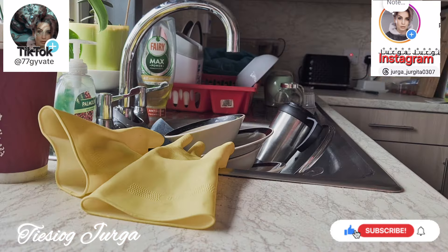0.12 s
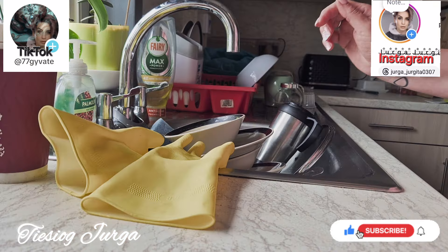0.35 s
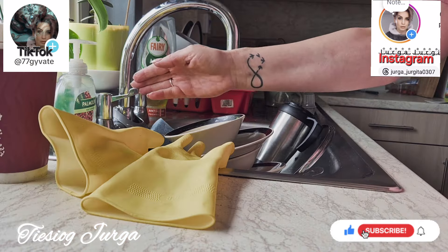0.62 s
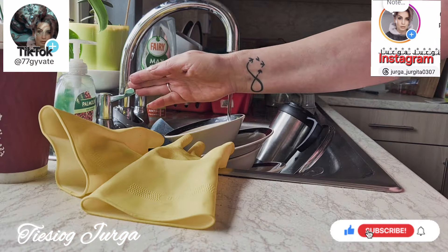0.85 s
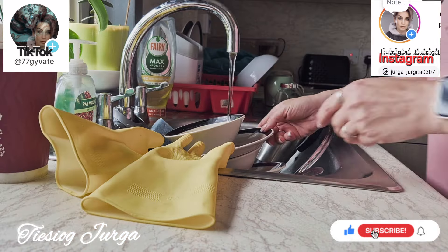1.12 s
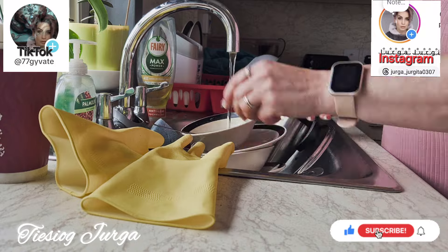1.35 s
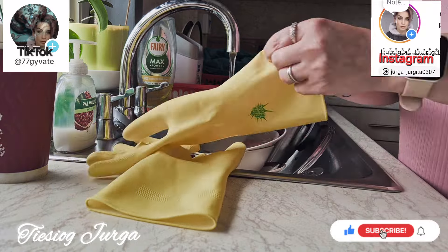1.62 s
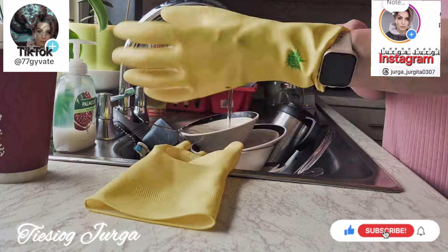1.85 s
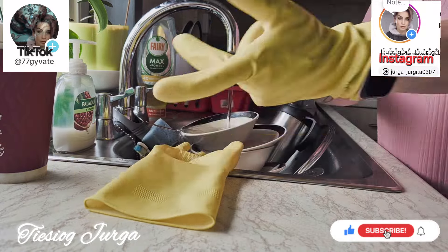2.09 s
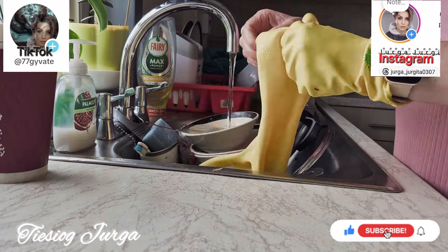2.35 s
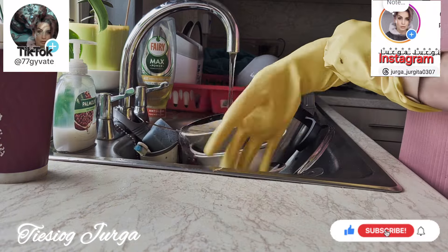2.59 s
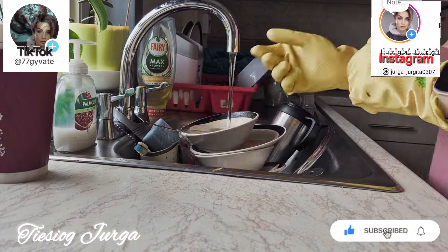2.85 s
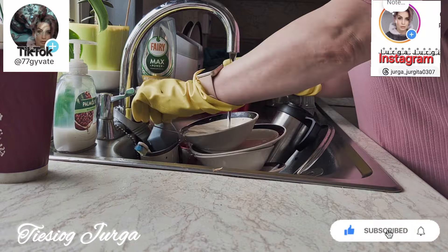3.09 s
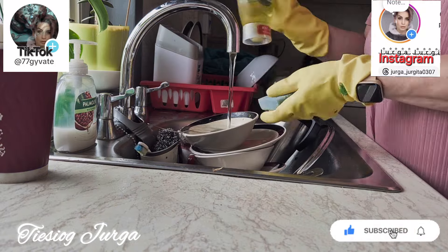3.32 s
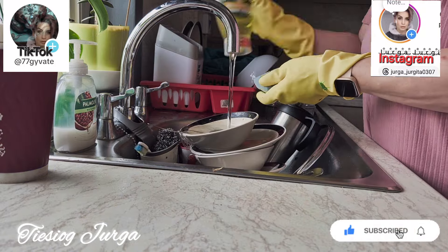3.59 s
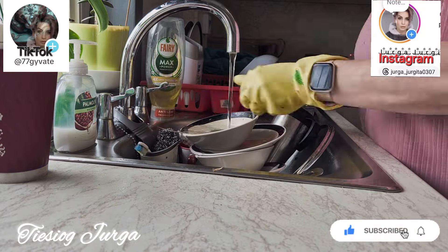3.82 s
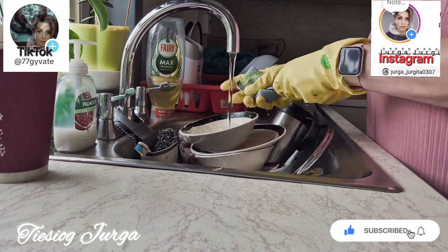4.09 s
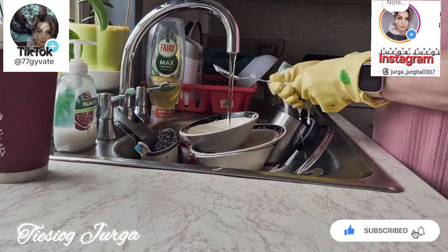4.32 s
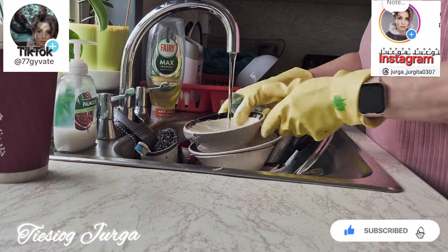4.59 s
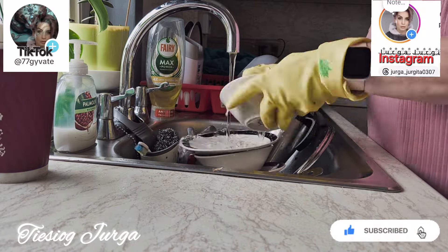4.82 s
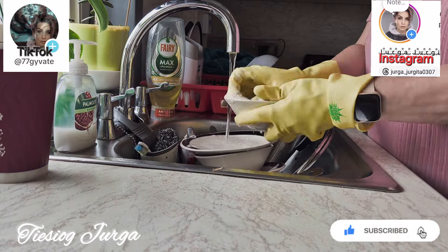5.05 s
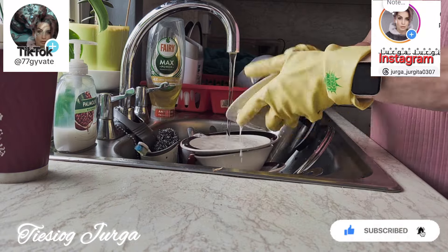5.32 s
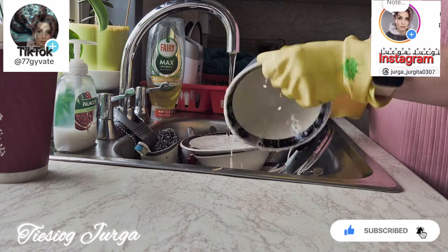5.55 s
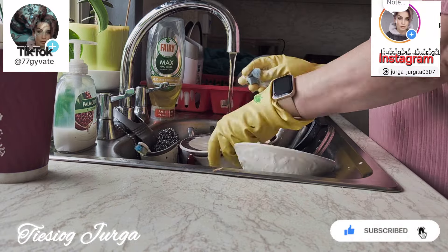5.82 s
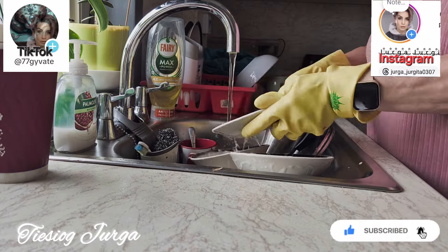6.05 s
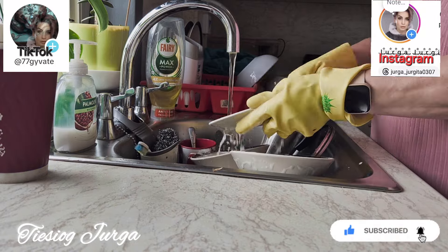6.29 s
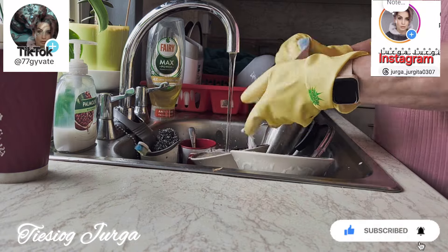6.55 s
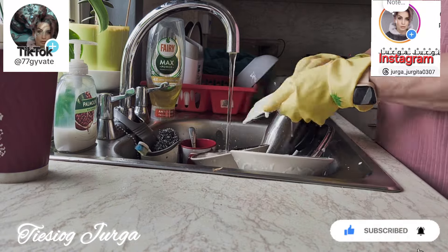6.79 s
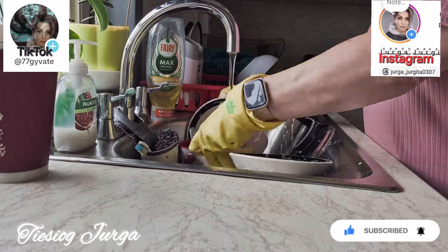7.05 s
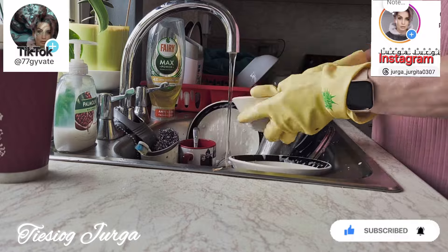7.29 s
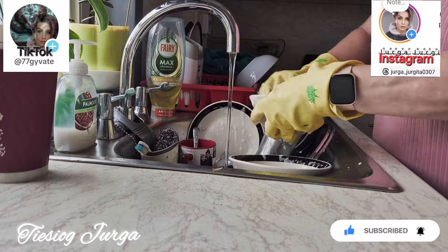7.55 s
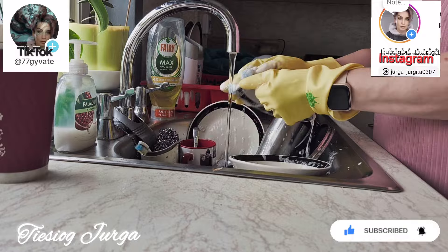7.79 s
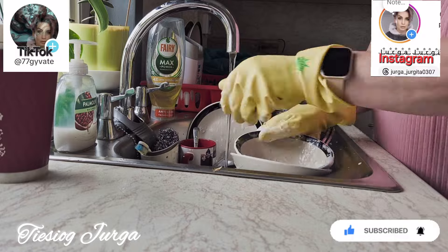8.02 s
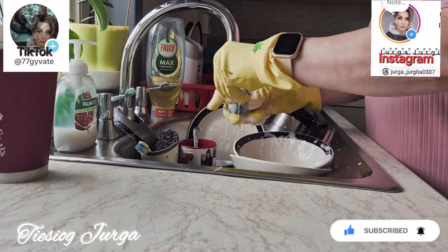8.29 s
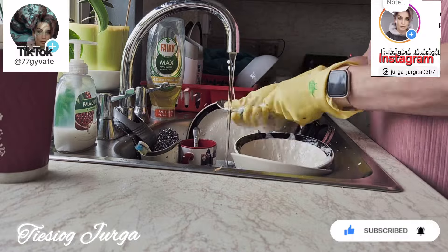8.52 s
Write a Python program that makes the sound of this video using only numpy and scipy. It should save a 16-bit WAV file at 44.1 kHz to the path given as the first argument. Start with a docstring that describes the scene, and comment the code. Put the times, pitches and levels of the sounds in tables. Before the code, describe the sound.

Running tap water drums on a metal sink as bowls, plates and a steel mug clack sharply together, like sped-up dishwashing heard close.

```python
"""A low wavering hum is cut off; after a blink of silence a kitchen tap opens with a thin whistle and a trickle.
The stream grows: noise hisses, gurgles among the dishes with small bubbles and, from 1.1 s, drums on the steel sink.
Bowls, plates, a spoon and a steel mug then knock together in gloved hands, amid large bubbles, rustles and splashes.
Each blow rings a set of tones over noise; as if time ran fast, most swell, ring for a few hundredths of a second
and are faded out. Sink walls and tiles answer shortly, and quiet kitchen air lies beneath the water."""
import sys
import numpy as np
from scipy import signal
from scipy.fft import rfft, irfft, next_fast_len
from scipy.io import wavfile
from scipy.ndimage import uniform_filter1d, map_coordinates

SR = 44100
rng = np.random.default_rng(int(sys.argv[2]) if len(sys.argv) > 2 else 0)


def int16_out(signal):
    """Quantize to a 16-bit WAV file."""
    q = np.round(np.clip(np.atleast_2d(signal).T, -1, 1) * 32767)
    wavfile.write(sys.argv[1], SR, q.astype(np.int16))


def boost_factor(decibels):
    """Convert a level in decibels to a linear amplitude factor."""
    exponent = np.asarray(decibels, float) / 20
    return 10 ** exponent


N = 381465  # samples in the scene
SLICE = 6144  # samples that hold one blow
WATER_FROM_S = 0.108  # water and kitchen air are silent before this

# low tones shared by the steel sink and the rustles: f/Hz, level/dB
LOW_MODES = [(132, -4), (240, 0), (350, 2), (520, 0), (760, -11), ]


def along(points, hz):
    """Reads a curve of (f/Hz, value) points on a log frequency axis."""
    f, v = np.transpose(points)
    return np.interp(np.log(hz + 1), np.log(f + 1), v)


def unit(x):
    """Scales a sound to rms 1."""
    return x / np.sqrt(np.mean(x ** 2) + 1e-20)


def wobble(rate):
    """A smooth random curve through rate random points a second."""
    points = rng.standard_normal(int(N * rate / SR) + 4)
    return map_coordinates(points, [np.arange(N) * rate / SR])


def coloured(pair, gain):
    """Two unrelated signals become left and right, alike in the bass, with a gain for each frequency."""
    # how alike the two sides are: f/Hz, likeness (0 to 1)
    alike = [(60, 0.91), (330, 0.94), (640, 0.39), (1500, 0.16), (4000, 0.022)]
    size = next_fast_len(pair.shape[1] + 2048)
    hz = np.fft.rfftfreq(size, 1 / SR)
    turn = np.arccos(np.clip(along(alike, hz), 0, 1)) / 2
    mid, side = rfft(pair, size) * gain(hz) * [np.cos(turn), np.sin(turn)]
    return irfft([mid + side, mid - side], size)[:, :pair.shape[1]]


def rush(spectrum, patchy_db):
    """Stereo noise of rms 1 whose gain varies in random patches of time and pitch."""
    z = signal.stft(rng.standard_normal((2, N)), nperseg=512)[2]
    field = rng.standard_normal(z.shape[1:])
    for axis in (0, 1):
        field = uniform_filter1d(field, size=5, axis=axis)
    pair = signal.istft(z * boost_factor(patchy_db * unit(field)), nperseg=512)[1][:, :N]
    # beyond its ends the spectrum falls away
    points = [(spectrum[0][0] / 2, -80), *spectrum, (spectrum[-1][0] * 4.5, -80)]
    return unit(coloured(pair, lambda hz: boost_factor(along(points, hz))))


def bubbles(start_s, peak_db, hz, swell_s, rise):
    """Soft swelling tones whose pitch climbs as the bubble nears the surface; the sides differ a little in phase."""
    t = np.arange(SLICE // 4) / SR
    u = t / swell_s[:, None]
    shape = boost_factor(peak_db)[:, None] * u * np.exp(1 - u)  # peaks at u = 1
    cycles = hz[:, None] * t * (1 + rise * u)
    at = (start_s * SR).astype(int)[:, None] + np.arange(len(t))
    sides = []
    for phase in .3 * rng.uniform(size=(len(hz), 2)).T[:, :, None]:
        tones = shape * np.sin(2 * np.pi * (cycles + phase))
        # add every bubble at its own place in time
        sides.append(np.bincount(at.ravel(), tones.ravel(), N + SLICE)[:N])
    return np.array(sides)


def hissing(hiss_db):
    """Air-filled water hisses as bright noise; a thin trickle lacks the top fizz, which comes with the stream."""
    # spectrum of the hiss: f/Hz, level per Hz/dB
    spectrum = [(2350, -6.5), (4000, -10.5), (5350, -6.5), (6610, -2), (7160, 1.5), (7760, -2.5), (8600, 3),
                (10500, -11.5), (11100, -9), (12100, -2.5), (13700, -5), (15100, -6), (15800, -1)]
    hiss = rush(spectrum, patchy_db=1.1)
    fizz = irfft(rfft(hiss) * (np.fft.rfftfreq(N, 1 / SR) > 9800), N)
    return hiss - fizz * np.clip((-62 - hiss_db) / 12, 0, 1)


def gurgling():
    """Water among the dishes: patchy noise mixed with many small bubbles, scaled to rms 1."""
    # spectrum of the gurgle: f/Hz, level per Hz/dB
    spectrum = [(260, -12), (450, -8), (889, -9), (1240, -3), (1760, -6.5), (2380, -9), (5500, -6.5),
                (7150, -44), (12100, -120)]
    count, small_share = 2500, .55
    when, pitch, size = rng.uniform(size=(count, 3)).T
    hz = 1500 * np.exp(.9 * (2 * pitch - 1))
    peak_db = -3.5 * np.log(size + .01) + 8 * np.log(hz / 1500)
    small = bubbles(when * N / SR, peak_db, hz, 3 / hz, rise=.01)
    return unit(rush(spectrum, patchy_db=2.6) + small_share * unit(small))


def drumming():
    """The stream beats on the steel floor of the sink: low noise, scaled to rms 1."""
    # spectrum of the drumming: f/Hz, level per Hz/dB
    spectrum = [(25, -42), (54, -20.5), (128, 4.5), (167, -6.5), (243, -3), (325, -9), (377, -7.5),
                (600, -13.5), (780, -58), (1320, -120)]
    return rush(spectrum, patchy_db=1.8)


def large_bubbles():
    """Single large bubbles plop as short tones, each with a lower, weaker one; their level flutters."""
    # single plops: t/s, peak level/dB, f/Hz
    plops = [(1.455, -39, 1386), (1.554, -40.5, 1326), (1.669, -47, 1235), (1.747, -36.5, 777),
             (1.862, -41, 623), (2.298, -41, 820), (2.457, -41.5, 1515), (4.109, -39, 1206),
             (4.352, -43, 1500), (5.293, -34, 1223), (5.311, -40, 940), (7.659, -35, 1135),
             (7.658, -33, 930), (7.711, -42, 2680)]
    s, db, hz = np.transpose(plops)
    swell_s = np.full(len(s), .006)
    main = bubbles(s, db + 0.5, hz, swell_s, rise=0.0068)
    lower = bubbles(s, db - 4, hz * 0.98, swell_s, rise=0.0068)
    return (main + lower) * boost_factor(3 * wobble(150))


def tap():
    """The running water: hiss, gurgle and drumming follow the stream and swell in splashes, with large bubbles."""
    # how the water runs: t/s, strength of the stream (level/dB), sloshing among the dishes (level/dB)
    course = [(0.13, -101, 6), (0.3, -74.5, 7), (0.58, -68, -3), (0.7, -59, 0.5), (0.78, -45.5, -4.5),
              (0.9, -41, 2), (1.12, -39, -4), (1.35, -43, -5), (2.6, -35.5, 3.5), (3.3, -34.5, -0.5),
              (4.2, -35, 3), (5.55, -34.5, 1.5), (5.8, -41, 3.5), (6.03, -40, 1), (7.9, -37.5, 5.5),
              (8.15, -37, 8), (8.6, -37, 1.5)]
    open_db = -45  # below this strength the gurgle weakens too
    gurgle_base_db, gurgle_growth = -48.5, 0.7  # growth: dB per dB of a weaker stream
    drum_base_db, drum_from_s = -50.5, 1.075
    s, *levels = np.transpose(course)
    t = np.arange(N) / SR
    hiss_db, slosh_db = [np.interp(t, s, level) for level in levels]
    gurgle_db = gurgle_base_db + gurgle_growth * np.minimum(hiss_db - open_db, 0) + slosh_db
    drum_gain = boost_factor(drum_base_db + 0.36 * slosh_db) * np.clip((t - drum_from_s) / 0.035, 0, 1)
    # splashes are brief broad swells: only the upward swings of chance count
    splash = np.clip(wobble(30), 0, 2) ** 2
    gurgle = gurgling()
    stream = drum_gain * boost_factor(1.3 * wobble(24) + 0.6 * splash) * drumming()
    stream += boost_factor(gurgle_db + 1.7 * splash) * gurgle
    stream += boost_factor(hiss_db + 0.6 * splash + 0.6 * wobble(4.1)) * hissing(hiss_db)
    plops = large_bubbles()
    # the splash around each large bubble
    spatter = uniform_filter1d(np.abs(plops), size=600, axis=1) * gurgle
    return stream * (t > WATER_FROM_S) + plops + spatter


def contact(hz, mode_db, swell_ms, t60, blur_db, clatter_db):
    """One contact: clear ringing tones, the same tones blurred by scraping, and a broad chattering clatter."""
    # broad clatter of every contact: f/Hz, level per Hz/dB
    clatter_spectrum = [(24, -50), (60, -14), (288, -2), (1140, -2), (5770, -10.5), (8180, -16),
                        (15700, -28.5)]
    chatter_per_s, chatter_depth, chatter_s = 300, .45, .002
    t, grid = np.arange(SLICE) / SR, np.fft.rfftfreq(SLICE, 1 / SR)
    after = np.maximum(t - swell_ms / 1000, 0)
    size = boost_factor(mode_db + 2.0 * rng.standard_normal(len(hz)))
    # high modes lose their energy sooner
    dying = boost_factor(-60 * after * (1 + (hz[:, None] / 6000) ** 4) / t60)
    cycles = hz[:, None] * t + rng.uniform(size=(2, len(hz), 1))
    ring = np.einsum("mt,cmt->ct", size[:, None] * dying, np.sin(2 * np.pi * cycles))
    # scraping contact drives the same modes with noise and blurs them
    width = 40 + 0.029 * hz[:, None]
    peaks = size @ (1 / (1 + ((grid - hz[:, None]) / width) ** 2))
    noise = rfft(rng.standard_normal((2, 2, SLICE)))
    blur, clatter = irfft(noise * [[peaks], [boost_factor(along(clatter_spectrum, grid))]])
    # the contact chatters: a few sharp micro-impacts, each gone in milliseconds
    ticks = (rng.uniform(size=SLICE) < chatter_per_s / SR) * rng.exponential(size=SLICE)
    tick_decay = np.exp(-t[:SLICE // 8] / chatter_s)
    chatter = 1 + chatter_depth * np.convolve(ticks, tick_decay)[:SLICE]
    top = slice(0, round(swell_ms * SR / 1000) + 400)
    clear = ring / np.std(ring[:, top])
    rub = boost_factor(blur_db - 60 * after / 0.18) * unit(blur)
    rattle = boost_factor(clatter_db - 60 * after / 0.11) * unit(clatter) * chatter
    return clear, rub + rattle


def blows(table, modes, knock_db, t60, blur_db, clatter_db):
    """Each blow swells, decays and is faded out; thud, knock and clink (low, middle, high) get their own levels.
    knock_db: how far the knock stands over thud and clink; t60: seconds in which low modes fall by 60 dB."""
    fade_ms = 11.8
    out, t_ms = np.zeros((2, N + SLICE)), np.arange(SLICE) / SR * 1000
    hz, mode_db = np.transpose(modes)
    for s, swell_ms, length_ms, db, bright_db in table:
        bands_db = db - knock_db - bright_db, db, db - knock_db + bright_db  # thud, knock, clink
        clear, rough = contact(hz, mode_db, swell_ms, t60, blur_db, clatter_db)
        # light contacts rub more than they strike: less clear ring
        sound = boost_factor(min(0, 0.22 * (max(bands_db) + 10.0))) * clear + rough
        low = coloured(sound, lambda f: 1 / (1 + (f / 600) ** 6))
        under = coloured(sound, lambda f: 1 / (1 + (f / 2500) ** 8))
        parts = low, under - low, coloured(sound, np.ones_like) - under
        top = slice(0, round(swell_ms * SR / 1000) + 400)
        sound = sum(boost_factor(band_db) * p / np.std(p[:, top]) for band_db, p in zip(bands_db, parts))
        swell = np.sin(np.pi / 2 * np.clip(t_ms / swell_ms, 0, 1))
        fade = np.sin(np.pi / 2 * np.clip((length_ms - t_ms) / fade_ms, 0, 1)) ** 2
        out[:, round(s * SR):][:, :SLICE] += sound * swell * fade
    return out[:, :N]


def plates():
    """Plates knock: many dense modes that die quickly."""
    # blows: t/s, swell/ms, length/ms, level/dB, brightness/dB (more clink, less thud)
    hits = [(4.436, 1, 21.6, -15, 11), (4.444, 1.3, 48, -17.5, 8.5), (4.497, 9.8, 39, -28.5, -4.5),
            (4.592, 6.3, 70, -19, -3.5), (4.728, 13, 40, -40, 9), (4.755, 7.6, 39, -29.5, 0.5),
            (4.79, 70, 110, -41.5, 7), (5.655, 18, 34.4, -18, 5), (5.685, 0.77, 23, -10, -3.5),
            (5.688, 8.8, 38, -13, -9.5), (5.87, 30, 77, -32.5, 1.5), (5.922, 25, 60, -34, 1)]
    # ringing tones: f/Hz, level/dB
    modes = [(140, -6), (300, -5), (431, -1), (598, 1), (800, -5), (1310, 1.5), (2420, -1.5), (3330, -1.5),
             (4740, -5.5), (6310, -13), (8060, -19)]
    return blows(hits, modes, knock_db=3.0, t60=0.09, blur_db=-2.0, clatter_db=-0.5)


def teaspoon_ping():
    """A short, clear high ping of a teaspoon."""
    # the ping: t/s, swell/ms, length/ms, level/dB, brightness/dB
    hits = [(4.615, 0.78, 30, -41.5, 11)]
    # ringing tones: f/Hz, level/dB
    modes = [(4750, 1), (8064, -3)]
    return blows(hits, modes, knock_db=-10.5, t60=.12, blur_db=-9, clatter_db=-12)


def mug():
    """The steel mug rings on longer, with much scraping and clatter."""
    # blows: t/s, swell/ms, length/ms, level/dB, brightness/dB
    hits = [(0.275, 12, 32, -63.5, 11), (1.122, 21, 37.2, -29.5, -4), (1.155, 4.4, 56, -25.5, -3),
            (3.914, 27, 37.5, -16, 2.5), (3.948, 5.4, 28, -34.5, -5.5), (6.628, 14, 41.6, -20, 3.5),
            (7.983, 15, 24, -33, 4.5), (7.998, 19.4, 40.3, -20.5, -1.5)]
    # ringing tones: f/Hz, level/dB
    modes = [(538, -1.5), (770, -15), (1030, -26), (1500, 3.5), (2640, -2), (3060, -2), (4530, -1),
             (6200, -11.5), (8740, -18)]
    return blows(hits, modes, knock_db=2.5, t60=0.33, blur_db=3.0, clatter_db=2.0)


def bowl():
    """A bowl rings clearly, with little scraping."""
    # blows: t/s, swell/ms, length/ms, level/dB, brightness/dB
    hits = [(3.058, 18, 42, -28, 7), (3.122, 20.7, 61.4, -24.5, 11)]
    # ringing tones: f/Hz, level/dB
    modes = [(525, -8), (974, -3.5), (2196, 3.5), (3526, -13), (3817, 3.5), (4920, -9), (5350, -15),
             (5857, -29), (8226, -10), (8969, -2.5)]
    return blows(hits, modes, knock_db=-3, t60=.25, blur_db=-11, clatter_db=-8)


def rinsed_bowl():
    """A rinsed bowl knocks with tones that die quickly."""
    # blows: t/s, swell/ms, length/ms, level/dB, brightness/dB
    hits = [(5.435, 0.52, 32.2, -7, 4.6), (5.455, 9.9, 40.7, -35, 1.5)]
    # ringing tones: f/Hz, level/dB
    modes = [(525, -8), (790, 0), (926, -2), (1290, -6), (1450, -3.5), (2150, -7.5), (2430, -2),
             (3400, -8.5), (4820, -4), (6346, -15.5)]
    return blows(hits, modes, knock_db=7.0, t60=0.094, blur_db=-0.5, clatter_db=-5.0)


def dish_and_bumps():
    """A dish knocks, among a few soft, dull splashes and bumps: many modes, strong scraping and clatter."""
    # knocks, splashes and bumps: t/s, swell/ms, length/ms, level/dB, brightness/dB
    hits = [(1.215, 22, 50, -26, -2), (1.24, 24, 39, -10.5, 7), (1.268, 11, 36, -16, 6.5),
            (1.295, 6.4, 31.8, -37.5, -11.5), (6.538, 28, 61, -39.5, 2.5), (6.961, 2.4, 32, -9.5, -1),
            (7.048, 11, 35, -18, 0), (7.066, 5.6, 46.8, -15.5, -5.5), (8.035, 15, 50, -37, -10),
            (8.076, 13, 80, -32.5, -8), (8.255, 9.5, 29, -40, -10), (8.505, 2.4, 24, -35.5, 1)]
    # ringing tones: f/Hz, level/dB
    modes = [(150, -9.5), (248, -4), (420, -12), (730, -14), (1470, 4.5), (2430, 1), (2800, 5), (3590, 4),
             (4200, 1.5), (4520, 0), (5080, -5), (6700, -3), (7110, -4.5), (9040, -1.5)]
    return blows(hits, modes, knock_db=4.0, t60=0.22, blur_db=3.0, clatter_db=4.0)


def saucer():
    """A saucer scrapes more than it rings."""
    # blows: t/s, swell/ms, length/ms, level/dB, brightness/dB
    hits = [(7.11, 27, 47, -28.5, 5), (7.154, 0.6, 28.6, -15.5, 10), (7.175, 4, 50.3, -20, 4.3),
            (7.243, 4.5, 31.2, -34, 5.6)]
    # ringing tones: f/Hz, level/dB
    modes = [(528, 3), (2060, 5.5), (2460, -0.5), (2918, -1), (3914, -2.5), (6400, -25)]
    return blows(hits, modes, knock_db=2.5, t60=0.11, blur_db=7, clatter_db=4)


def spoon():
    """A spoon clinks with two high modes."""
    # blows: t/s, swell/ms, length/ms, level/dB, brightness/dB
    hits = [(3.056, 18, 37.7, -49, 21)]
    # ringing tones: f/Hz, level/dB
    modes = [(3400, -10.5), (4500, -3)]
    return blows(hits, modes, knock_db=-10.5, t60=.3, blur_db=-15, clatter_db=-15)


def sink():
    """Knocks on the steel sink: low modes that die slowly until the fade."""
    # blows: t/s, swell/ms, length/ms, level/dB, brightness/dB
    hits = [(3.976, 8.6, 38, -44.5, -3.5), (4.063, 8.2, 34, -40, -1.5), (4.522, 7.7, 34, -26, -3.5),
            (4.548, 25, 49.4, -40, -5), (5.775, 12, 60, -50, -9.5), (5.838, 19, 45, -41.5, -2),
            (6.988, 39, 71.4, -31.5, -6), (8.303, 9.3, 39.3, -31, -5.5)]
    return blows(hits, LOW_MODES, knock_db=-3.0, t60=0.81, blur_db=1.5, clatter_db=-3.0)


def rustles():
    """Soft rustles, as of rubber gloves rubbing, and a splash: mostly noise shaped by low modes."""
    # rustles, the last one a splash: t/s, swell/ms, length/ms, level/dB, brightness/dB
    rubs = [(1.743, 83, 90, -43.5, 1.6), (1.85, 41, 52, -42.5, 7.2), (8.145, 12, 60, -37.5, 6)]
    return blows(rubs, LOW_MODES, knock_db=9.5, t60=0.18, blur_db=11, clatter_db=-1)


def worktop():
    """Dull thuds on the worktop: three low modes."""
    # blows: t/s, swell/ms, length/ms, level/dB, brightness/dB
    hits = [(0.295, 35, 53, -78, -18), (0.522, 16, 34.2, -74.5, -20), (1.085, 6.6, 29, -55, -7),
            (3.68, 19.5, 38, -32, -7)]
    # ringing tones: f/Hz, level/dB
    modes = [(55, 3), (126, -2.5), (436, -6), ]
    return blows(hits, modes, knock_db=-4.5, t60=.3, blur_db=3, clatter_db=-9)


def valve_whistle():
    """A thin wavering whistle of the valve as the tap opens."""
    t = np.arange(N) / SR
    whistle = boost_factor(-73.5 + 4 * wobble(28)) * np.sin(2 * np.pi * 2566 * t + 1.2 * wobble(60))
    return whistle * np.interp(t, [.11, .13, .62, .75], [0, 1, 1, 0])


def opening_hum():
    """A low wavering hum of 178 Hz over faint noise, cut off before the water starts."""
    t = np.arange(N) / SR
    hum = boost_factor(-56 + 4.6 * wobble(50)) * np.sin(2 * np.pi * 178 * t + 1.23 * wobble(60))
    hum = hum + boost_factor(-75) * rush([(300, -2), (6000, -30)], patchy_db=0)
    return hum * (t < .08)


def kitchen(x):
    """A short answer of sink walls and tiles: the sound is smeared by noise that dies away."""
    t60 = 0.12  # seconds to fall by 60 dB
    t = np.arange(SR // 4) / SR
    tail = rng.standard_normal((2, len(t))) * boost_factor(-60 * t / t60)
    echo = signal.fftconvolve(x, tail / np.linalg.norm(tail[0]), axes=1)[:, :N]
    return coloured(echo, np.ones_like)


def room_air():
    """Quiet kitchen air with a far rumble: steady, mostly low noise that starts with the water."""
    # spectrum of the air: f/Hz, level per Hz/dB
    spectrum = [(30, -13), (60, 1.5), (140, -8), (380, 2), (900, -23), (3000, -27), (9000, -28)]
    return boost_factor(-61) * rush(spectrum, patchy_db=1.5) * (np.arange(N) / SR > WATER_FROM_S)


def scene():
    """Dishes and rustles with their short echo, water, whistle, opening hum and kitchen air."""
    dishes = plates() + teaspoon_ping() + mug() + bowl() + rinsed_bowl() + dish_and_bumps() + saucer() + spoon()
    dishes = dishes + sink() + rustles() + worktop()
    return dishes + boost_factor(-17) * kitchen(dishes) + tap() + valve_whistle() + opening_hum() + room_air()


def top_cut(x):
    """Nothing passes above the cut-off."""
    return signal.sosfilt(signal.butter(12, 15810, fs=SR, output="sos"), x)


def record(dry):
    """The left side is a little louder, except in the top treble; the hardest blows clip."""
    # left over right: f/Hz, level/dB
    lean = [(60, 3.5), (300, 1.8), (8000, 1.46), (14000, -1.5)]
    half_db = along(lean, np.fft.rfftfreq(N, 1 / SR)) / 2
    mix = irfft(rfft(dry) * boost_factor([half_db, -half_db]), N)
    mix = np.clip(mix, -1, 1)
    return top_cut(mix)


dry = scene()
out = record(dry)
int16_out(out)
```